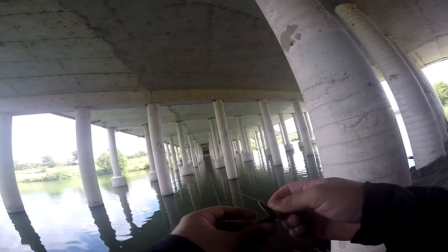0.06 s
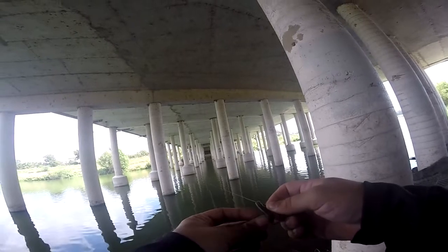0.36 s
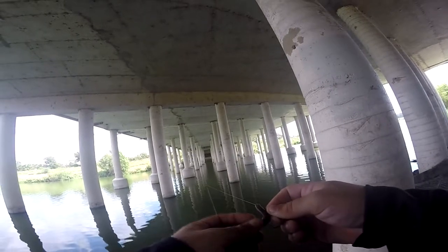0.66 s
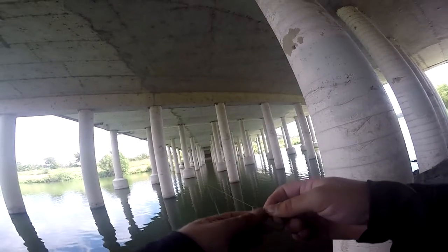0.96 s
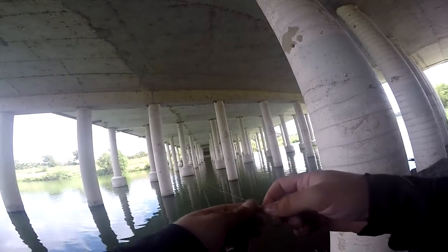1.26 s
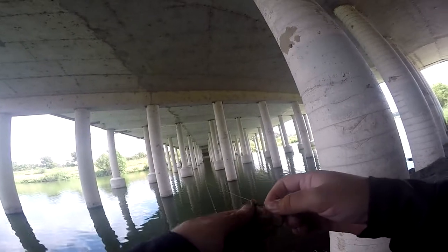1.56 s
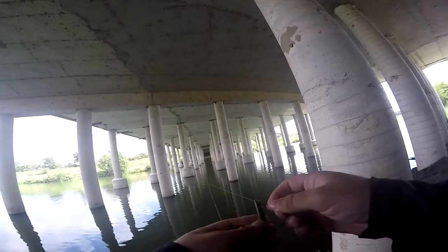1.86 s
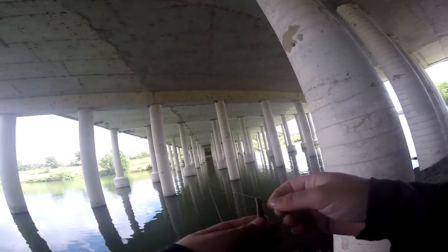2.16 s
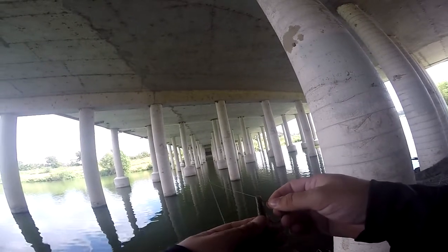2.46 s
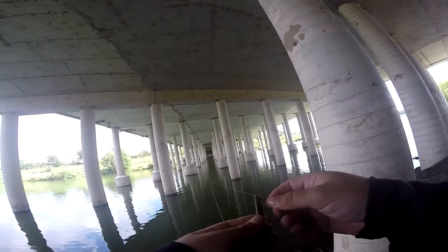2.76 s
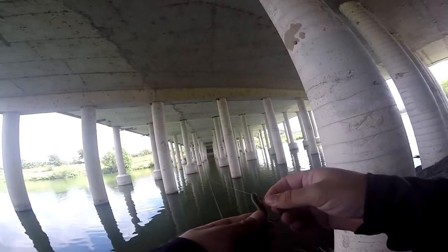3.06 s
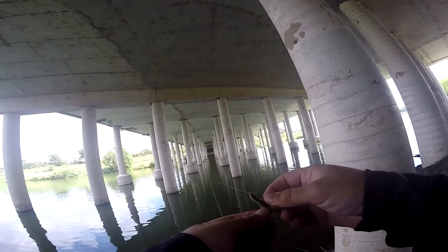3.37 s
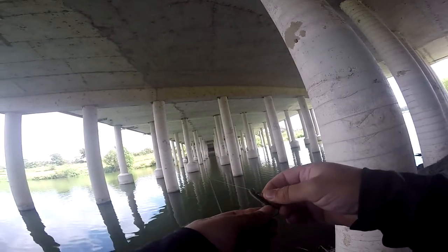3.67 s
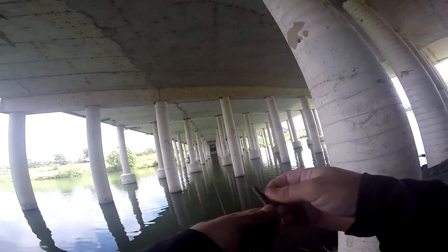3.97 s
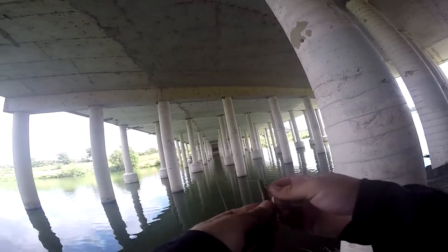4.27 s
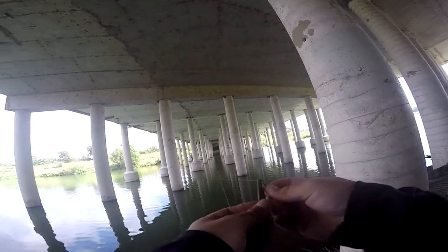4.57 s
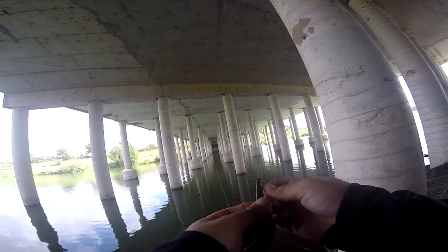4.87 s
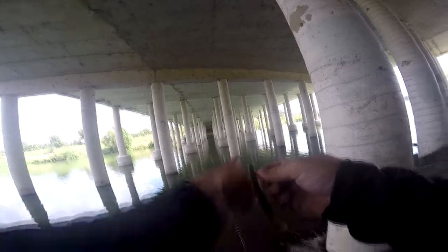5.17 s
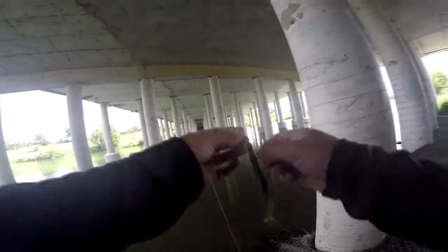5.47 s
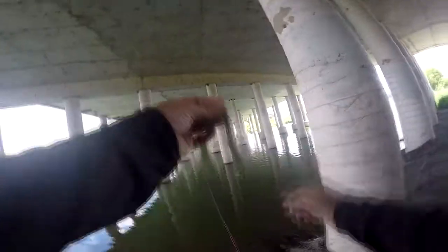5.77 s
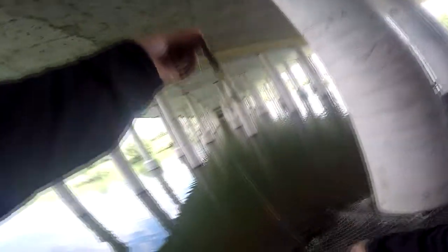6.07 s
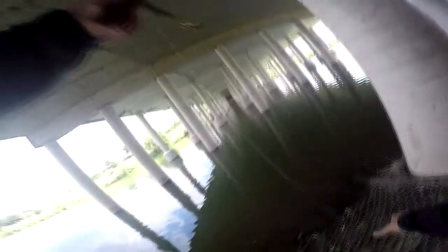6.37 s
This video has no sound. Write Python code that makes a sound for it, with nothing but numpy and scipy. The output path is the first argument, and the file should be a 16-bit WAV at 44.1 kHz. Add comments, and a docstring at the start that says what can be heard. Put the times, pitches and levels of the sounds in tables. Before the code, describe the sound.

Under a concrete bridge, vehicles drone and an engine pulls away above, while small birds twitter faintly and a sleeve rustles close by.

```python
"""Under a concrete highway bridge, beside still water, with a small body-worn microphone on the bank.
Traffic shakes the deck and its tyre roar washes in between the pillars. A V8 pulls away overhead, its
firing hum slowly rising, then comes off the throttle and fades; a second engine hums further along.
Small birds chirp faintly under the deck. Close to the microphone, fishing tackle ticks, a sleeve
rustles as an arm is raised, and the line squeaks as it is drawn taut."""
import sys
import numpy as np
from scipy import signal
from scipy.fft import rfft, irfft, next_fast_len
from scipy.io import wavfile
from scipy.ndimage import uniform_filter1d

SR = 44100
rng = np.random.default_rng(int(sys.argv[2]) if len(sys.argv) > 2 else 0)


def to_wav(sig):
    """Store sig (one row per channel, or 1-D mono) as 16-bit WAV at the path in sys.argv[1].

    Samples outside -1..1 are clipped; the rate is SR.
    """
    pcm = np.clip(np.atleast_2d(sig), -1, 1) * 32767
    pcm = np.round(pcm).astype(np.int16)
    wavfile.write(sys.argv[1], SR, pcm.T)  # frames by channels


N = 282681
TIME = np.arange(N) / SR


def undb(db):
    """Decibels to gain."""
    return 10 ** (np.asarray(db) / 20)


def unit(x):
    """Scale to rms 1."""
    return x / np.sqrt(np.mean(x ** 2))


def curves(table):
    """Each column after the time column as a control signal."""
    time_s, *columns = np.transpose(table)
    return [np.interp(TIME, time_s, column) for column in columns]


def noise(spectrum):
    """Noise of rms 1 with the given colour, falling steeply beyond both ends."""
    hz, db = np.transpose(spectrum)
    size = next_fast_len(N)
    bins = np.arange(size // 2 + 1) * SR / size + 1
    skirts = np.minimum(np.minimum(bins / hz[0], hz[-1] / bins), 1) ** 4
    gain = undb(np.interp(np.log(bins), np.log(hz), db)) * skirts
    return unit(irfft(rfft(rng.standard_normal(size)) * gain, size)[:N])


def wander(rate_hz):
    """Smooth random drift of rms 1, changing about rate_hz times a second."""
    hold = int(SR / rate_hz)
    steps = np.repeat(rng.standard_normal(N // hold + 2), hold)
    return unit(uniform_filter1d(uniform_filter1d(steps, hold), hold)[:N])


def add(track, start_s, sound):
    """Mix a short sound into a track."""
    i = max(int(start_s * SR), 0)
    part = sound[:max(N - i, 0)]
    track[i:i + len(part)] += part


# Deck rumble, body drone and tyre roar from below the bridge: frequency_hz, relative_db
DECK_SPECTRUM = [(15, -10), (23, -.5), (30, 1), (40, -1.5), (56, -2.5), (67, -6), (79, -13), (95, -11.5),
                 (118, -11), (140, -16.5), (200, -21), (300, -34)]
DRONE_SPECTRUM = [(90, -3), (170, -1), (250, 2), (350, -0.5), (470, -4), (620, -6), (800, -12.5),
                  (1200, -34), (2000, -70)]
TYRE_SPECTRUM = [(300, -8.5), (600, -5), (850, -.5), (1120, 1), (1400, -5), (1800, -11), (2500, -19.5),
                 (3500, -23.5), (5000, -35), (7000, -41)]
# Vehicles crossing overhead: nearest_s, half_power_after_s, deck_db, drone_db, tyre_db
CROSSINGS = [(.33, 0.34, -54, -45.5, -51), (1.25, 0.14, -39.5, -45, -58), (2.25, 0.63, -39.5, -58, -62),
             (3.5, 0.39, -36.5, -48.5, -54.5), (4.02, 0.094, -50, -57, -61), (4.6, 0.74, -34, -56, -53),
             (5.22, 0.16, -42.5, -65, -51.5), (5.8, 0.28, -45, -50, -52.5), (6.25, 0.47, -40, -48, -54.5)]

def traffic(deck_db=-36, drone_db=-46, tyre_db=-50):
    """Overhead, wheels shake the deck, bodies drone, tyres roar; each crossing swells a steady stream."""
    power = undb([deck_db, drone_db, tyre_db])[:, None] ** 2
    for nearest_s, half_power_after_s, *levels_db in CROSSINGS:
        nearness = 1 / (1 + ((TIME - nearest_s) / half_power_after_s) ** 2)  # inverse square law
        power = power + undb(levels_db)[:, None] ** 2 * nearness
    deck_gain, drone_gain, tyre_gain = np.sqrt(power)
    deck = noise(DECK_SPECTRUM) * deck_gain
    drone = noise(DRONE_SPECTRUM) * drone_gain * undb(.39 * wander(7.3))
    tyres = noise(TYRE_SPECTRUM) * tyre_gain * undb(.27 * wander(10))
    return deck + drone + tyres


# The V8 pulling away overhead: time_s, firing_hz
V8_REVS = [(0, 133.4), (.25, 133.3), (.5, 137.5), (.8, 144.8), (1.2, 149.3), (2.1, 151.3), (2.5, 154.9),
           (3, 159.3), (3.35, 161.8), (3.65, 161.5), (3.95, 155.8), (4.6, 148)]
# Its firing note, surging and breaking up between the pillars: time_s, level_db
FIRING_LEVEL = [(0, -35.5), (.16, -44), (.31, -41.5), (.44, -32.5), (.62, -37.5), (.66, -52), (.73, -36),
                (.88, -44), (1.03, -48), (1.1, -38), (1.21, -36.5), (1.3, -43), (1.44, -41), (1.57, -56),
                (1.67, -44), (1.88, -40), (2.1, -51), (2.19, -37.5), (2.29, -45), (2.37, -37),
                (2.52, -37.3), (2.61, -45), (2.68, -35.3), (2.83, -38.5), (2.89, -47), (2.96, -36.5),
                (3.06, -35), (3.19, -47.5), (3.27, -36), (3.45, -34.3), (3.58, -38), (3.7, -39),
                (3.77, -35.5), (3.86, -36), (3.95, -45), (4.12, -44.5), (4.25, -54)]
# Its strongest overtone, from the lope of the two cylinder banks: time_s, level_db
BANK_LEVEL = [(0, -44), (.12, -42.5), (.2, -49), (.28, -43.5), (.42, -43.5), (.51, -54), (.73, -41.5),
              (.85, -54), (.94, -41), (1.2, -48), (1.41, -41), (1.49, -54), (1.6, -45), (1.73, -42),
              (1.81, -51), (1.92, -42.5), (2.09, -37), (2.17, -53), (2.28, -41), (2.44, -45), (2.52, -40.5),
              (2.63, -42), (2.72, -54), (2.92, -47), (3.12, -43.5), (3.27, -47.5), (3.42, -41), (3.52, -43),
              (3.62, -39.5), (3.76, -39.8), (3.86, -49), (4.06, -45), (4.25, -52)]
# Weaker overtones of the uneven exhaust beat: cycle_multiple, level_db
LOPE_OVERTONES = [(3, -47.5), (6, -53.5), (9, -59), (10, -53.5), (13, -49.5), (16, -60.5)]
# Rush of the exhaust gas: frequency_hz, relative_db
RUSH_SPECTRUM = [(100, -4.5), (125, .5), (160, -3), (230, -5.5), (330, -11)]

def v8_engine(throttle_off_s=4.25, note_fade_db_per_s=27, rush_db=-49, rush_fade_db_per_s=5):
    """Up on the deck, eight firings a cycle make the note; uneven banks add overtones, and gas rushes."""
    firing_hz, = curves(V8_REVS)
    firing_db, = curves(FIRING_LEVEL)
    bank_db, = curves(BANK_LEVEL)
    cycle_hz = firing_hz / 8
    cycle_phase = 2 * np.pi * np.cumsum(cycle_hz * (1 + .005 * wander(14))) / SR
    tones = undb(firing_db) * np.sin(8 * cycle_phase)
    tones += undb(bank_db) * np.sin(11 * cycle_phase + .4 * wander(12))
    for multiple, level_db in LOPE_OVERTONES:
        # echo paths shift as the vehicle moves, so each overtone swells and wavers alone
        swell_db = 2.2 * wander(14)
        phase = multiple * cycle_phase + .4 * wander(12) + rng.uniform(0, 2 * np.pi)
        # an echo partly cancels the overtone as it glides through 263.5 Hz
        dip_db = -13 * np.exp(-((multiple * cycle_hz - 263.5) / 5) ** 2)
        tones += undb(level_db + dip_db + swell_db) * np.sin(phase)
    coasting_s = np.maximum(TIME - throttle_off_s, 0)  # the note dies first, the rush lingers
    note = np.sqrt(2) * tones * undb(-note_fade_db_per_s * coasting_s)
    rush = noise(RUSH_SPECTRUM) * undb(rush_db - rush_fade_db_per_s * coasting_s)
    return note + rush


def chirp(length_s, start_hz, end_hz, roughness, attack_share=.3):
    """One gliding tone with a rounded fall; roughness shakes its pitch and level."""
    n = int(length_s * SR)
    progress = np.linspace(0, 1, n)
    rasp = unit(uniform_filter1d(rng.standard_normal(n), size=30))
    flutter = unit(signal.fftconvolve(rng.standard_normal(n), signal.windows.hann(300), "same"))
    pitch_hz = (start_hz + (end_hz - start_hz) * progress) * (1 + .08 * roughness * rasp)
    envelope = np.minimum(progress / attack_share, 1) * np.cos(np.pi / 2 * progress)
    envelope *= unit(undb(7 * roughness * flutter))
    return np.sqrt(2) * envelope * np.sin(2 * np.pi * np.cumsum(pitch_hz) / SR)


def bridge_echo(sound, wet_db, t60_s=.8, build_s=.0077):
    """Deck, pillars and water scatter a sound into a dense tail."""
    t = np.arange(int(t60_s * SR)) / SR
    envelope = undb(-60 * t / t60_s) * (1 - np.exp(-t / build_s))
    tail = rng.standard_normal(len(t)) * envelope
    return sound + undb(wet_db) * signal.fftconvolve(sound, tail / np.linalg.norm(tail))[:N]


# The nearer bird calls: start_s, length_s, start_hz, end_hz, level_db, roughness (0-1)
BIRD_CALLS = [(.048, .026, 4300, 4030, -65, .6), (.502, .016, 4100, 4500, -61, 1),
              (.569, .018, 3700, 4350, -58.5, .55), (.653, .012, 6000, 5650, -64, .4),
              (.651, .026, 3720, 3330, -55, .4), (.655, .15, 5430, 5400, -69, .3),
              (.843, .034, 3900, 3700, -62, .3), (.935, .035, 3300, 3050, -65, .5),
              (1.082, .016, 4200, 3900, -64, .8), (1.125, .03, 3600, 3350, -66, .7),
              (1.173, .018, 4500, 4000, -62, 1), (1.456, .05, 4780, 4220, -63, .4),
              (1.511, .035, 4550, 4200, -68, .4), (1.545, .037, 3100, 3150, -64, .2),
              (1.563, .018, 5660, 6150, -67, .7), (1.646, .016, 5950, 5750, -66.5, .5),
              (1.778, .05, 4230, 3850, -64.5, .5), (1.82, .08, 3550, 3480, -65.5, .3),
              (1.84, .025, 4350, 4200, -67, .4), (2.05, .035, 3900, 3500, -64, .8),
              (3.287, .018, 3950, 3400, -59, 1), (3.472, .01, 6400, 4000, -66, .8),
              (3.480, .018, 3550, 3300, -62, .55), (3.571, .007, 6500, 4600, -65, .6),
              (3.571, .019, 3650, 3550, -54.5, .35), (3.643, .018, 4000, 4500, -60, 1),
              (4.415, .03, 3450, 3550, -66, .4), (4.536, .022, 3570, 3670, -62, .4),
              (4.564, .03, 4750, 4700, -65, .3), (4.963, .039, 4350, 3630, -63, .4),
              (5.025, .04, 3600, 3550, -62, .4), (5.415, .04, 3400, 3300, -67, .3),
              (5.745, .043, 3550, 3500, -64, .3), (5.95, .03, 4100, 3850, -65, .5),
              (6.186, .045, 5970, 5450, -66.5, .55)]

def near_birds():
    """Small birds chirp under the deck, near enough to carry only a faint echo."""
    calls = np.zeros(N)
    for start_s, length_s, start_hz, end_hz, level_db, roughness in BIRD_CALLS:
        add(calls, start_s, undb(level_db) * chirp(length_s, start_hz, end_hz, roughness))
    return bridge_echo(calls, wet_db=-6)


# Spells of twittering further off: start_s, end_s, calls_per_s, base_db
FLOCK_SPELLS = [(0, 2.15, 36, -74), (2.15, 6.4, 22, -74.5)]

def far_flock(call_s=.0212, spread_db=5):
    """A distant flock: tiny random calls, smeared between the pillars."""
    calls = np.zeros(N)
    for start_s, end_s, calls_per_s, base_db in FLOCK_SPELLS:
        span_s = end_s - start_s
        for when, pitch, glide, strength, roughness in rng.random((int(calls_per_s * span_s), 5)):
            start_hz = 3150 + 1300 * pitch ** 1.5
            end_hz = start_hz * (.85 + .208 * glide)
            gain = undb(base_db + spread_db * (strength + .5))
            add(calls, start_s + when * span_s, gain * chirp(call_s, start_hz, end_hz, roughness))
    return bridge_echo(calls, wet_db=1)


# Tackle handled close to the microphone: start_s, peak_db, pitch_hz, width_hz, decay_s
TACKLE_TICKS = [(.581, -54, 5000, 2500, .0018), (1.034, -57.5, 7900, 3000, .0018),
                (3.017, -51, 7350, 2000, .0018), (3.855, -58, 7200, 2400, .003),
                (3.885, -55.5, 7400, 2400, .0014), (3.911, -59, 7000, 2400, .0018),
                (4.009, -47.5, 10000, 14000, .0007), (4.053, -56, 7000, 3000, .001),
                (6.364, -46, 13000, 10000, .001), (6.396, -41, 4700, 1700, .0018)]

def tackle():
    """Hook and line tick between the fingers, each tiny scrape ringing a resonance."""
    ticks = np.zeros(N)
    t = np.arange(SR // 40) / SR
    for start_s, peak_db, pitch_hz, width_hz, decay_s in TACKLE_TICKS:
        resonance = signal.iirpeak(pitch_hz, pitch_hz / width_hz, fs=SR)
        scrape = rng.standard_normal(len(t)) * np.exp(-t / decay_s)
        tick = signal.lfilter(*resonance, signal.lfilter(*resonance, scrape))
        add(ticks, start_s, undb(peak_db) * tick / np.abs(tick).max())
    return ticks


# A second vehicle further along the bridge: time_s, firing_hz, level_db
FAR_ENGINE_NOTE = [(4.8, 81.6, -70), (5.2, 83.23, -44.5), (5.6, 87.5, -49), (6.1, 92.6, -43.5),
                   (6.41, 94, -54)]

def far_engine():
    """Only the wavering firing note of the second vehicle gets through the deck."""
    firing_hz, level_db = curves(FAR_ENGINE_NOTE)
    phase = 2 * np.pi * np.cumsum(firing_hz * (1 + .019 * wander(7.7))) / SR
    return np.sqrt(2) * np.sin(phase) * undb(level_db + 2 * wander(9))


# Strokes of the arm, right by the microphone: fastest_s, rise_and_fall_s, level_db
ARM_STROKES = [(5.22, .08, -68), (5.7, .07, -70.5), (5.96, .13, -65), (6.2, .1, -73), (6.4, .09, -56.5)]
# Rubbing cloth: frequency_hz, relative_db
CLOTH_SPECTRUM = [(1400, -1), (2400, 3.5), (3200, -1), (4300, -1), (5500, -4.5), (7000, -3.5), (8800, -5),
                  (10500, -10), (15000, -15)]

def sleeve():
    """Cloth slides over cloth in small, soft catches, swelling and dying with each stroke of the arm."""
    swell = sum(undb(level_db) * np.exp(-((TIME - fastest_s) / rise_s) ** 2)
                for fastest_s, rise_s, level_db in ARM_STROKES)
    catches = undb(.8 * wander(220))
    return unit(noise(CLOTH_SPECTRUM) * catches) * swell


def taut_line(start_s=6.268, level_db=-69):
    """Within arm's reach, the fishing line gives a thin rising squeak as it is drawn taut."""
    track = np.zeros(N)
    squeak = chirp(length_s=.065, start_hz=12000, end_hz=15700, roughness=.1, attack_share=.5)
    add(track, start_s, undb(level_db) * squeak)
    return track


def scene():
    """Everything as it reaches the bank under the bridge, in mono."""
    road = traffic() + v8_engine() + far_engine()
    birds = near_birds() + far_flock()
    angler = tackle() + taut_line() + sleeve()
    return (road + birds + angler)[None]


# Self-noise of the microphone: frequency_hz, relative_db
HISS_SPECTRUM = [(1500, 3.5), (3700, 9.5), (5300, 6), (7100, 2), (8300, 0.5), (9400, -.5), (9950, 4.5),
                 (10450, 6), (11000, -2.5), (13000, -2), (15500, -3.5)]

def record(dry):
    """The small body-worn microphone adds its own hiss and cuts the top above 15.4 kHz."""
    hiss = noise(HISS_SPECTRUM) * undb(-67.5)
    top_cut = signal.ellip(12, .2, 80, 15400, fs=SR, output="sos")
    return signal.sosfilt(top_cut, dry + hiss)


dry = scene()
out = record(dry)
to_wav(out)
```